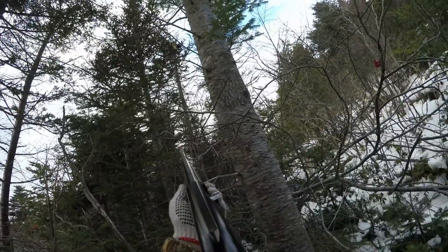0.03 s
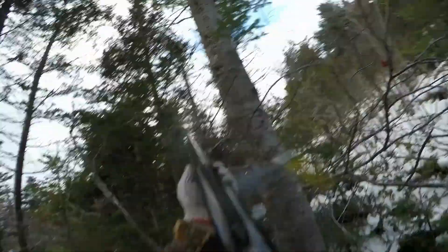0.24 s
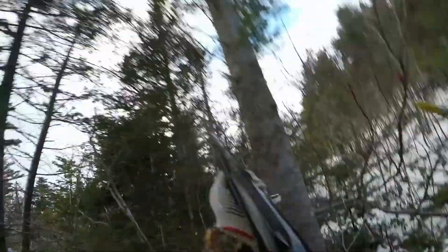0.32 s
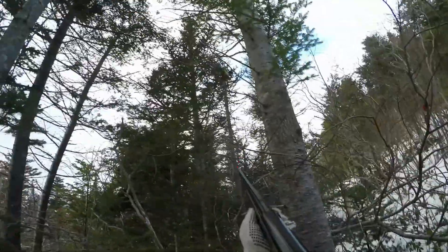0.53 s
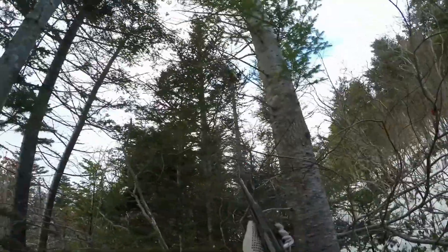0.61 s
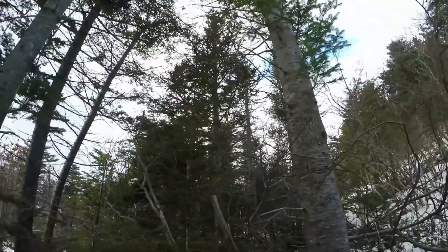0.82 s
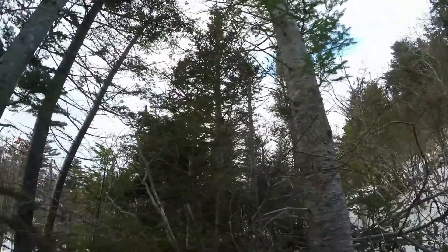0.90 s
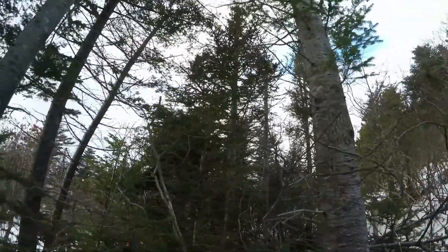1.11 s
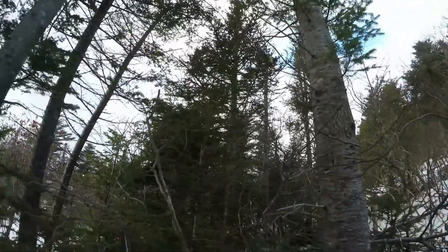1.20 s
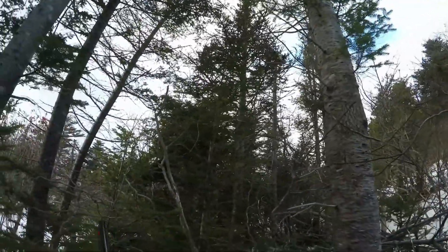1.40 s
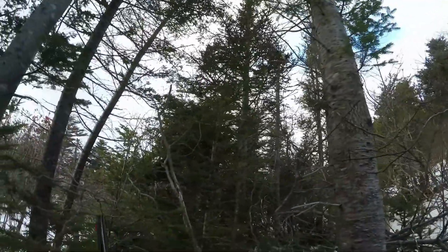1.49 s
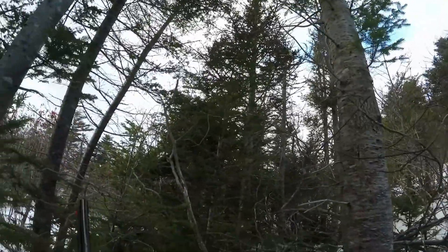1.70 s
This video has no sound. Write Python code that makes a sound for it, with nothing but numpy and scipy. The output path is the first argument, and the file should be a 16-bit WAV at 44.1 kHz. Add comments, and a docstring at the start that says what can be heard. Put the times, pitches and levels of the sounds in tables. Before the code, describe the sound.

One sharp gunshot goes off right beside the microphone in a snowy wood and distorts briefly. A short tail, a metallic click and hollow echoes follow, then a few soft clicks and light wind as the gun is lowered.

```python
"""In a snowy wood, a long gun fires once, close by. The action snaps, then the muzzle blast, a sudden release
of gas, overloads the microphone. Trunks reflect and scatter the crack into a short tail; echoes and a low roll
return from the slopes, and each echo is heard as a short low ringing. The gun clicks as it recoils and is
lowered, over faint hiss and wind on the microphone."""
import sys
import numpy as np
from scipy import signal
from scipy.fft import rfft, irfft
from scipy.io import wavfile

SR = 44100
rng = np.random.default_rng(int(sys.argv[2]) if len(sys.argv) > 2 else 0)


def waveform_to_disk(signal):
    """Save audio, clipped to [-1, 1], as 16-bit WAV at the path in sys.argv[1]."""
    frames = np.transpose(np.atleast_2d(signal))
    scaled = np.clip(frames, -1, 1) * 32767
    samples = np.round(scaled).astype(np.int16)
    wavfile.write(sys.argv[1], SR, samples)


N = 77175
TIME = np.arange(N) / SR
FREQS = np.maximum(np.fft.rfftfreq(N, 1 / SR), 1)
BLAST_S = .2352

# spectrum of the crack, direct and reflected: frequency_hz, level_db
CRACK_SPECTRUM = [(150, -12), (520, 2.5), (700, -3), (850, -2), (1050, -8), (1450, 5.5), (1950, -9),
                  (2300, -2), (2700, 2), (3800, -7), (4500, -4.5), (5700, -2), (8200, -15), (11000, -13),
                  (15000, -21)]


def from_db(db):
    """Amplitude grows tenfold every 20 dB."""
    return 10 ** (np.asarray(db) / 20)


def level(curve):
    """Gain over time, interpolated in decibels between (time_s, level_db) points."""
    return from_db(np.interp(TIME, *np.transpose(curve)))


def noise(spectrum, tilt_db=0):
    """Spectral shaping of white noise, tilted by tilt_db per octave above 900 Hz; rms 1."""
    hz, db = np.transpose(spectrum)
    shape_db = np.interp(np.log(FREQS), np.log(np.sort(hz)), db)
    gain = from_db(shape_db + tilt_db * np.log2(np.maximum(FREQS, 900)))
    x = irfft(rfft(rng.standard_normal(N)) * gain, N)
    return x / x.std()


def since(start):
    """Seconds since a moment, zero before it."""
    return np.maximum(TIME - start, 0)


def burst(start, rise_s, t60_s):
    """Envelope of an impulse: a quick rise, then exponential decay."""
    t = since(start)
    return (1 - np.exp(-t / rise_s)) * np.exp(-np.log(1000) * t / t60_s)


def swell(centre_s, half_s):
    """Gaussian envelope, down to 1/e at half_s from its centre."""
    return np.exp(-((TIME - centre_s) / half_s) ** 2)


def thud(start, hz, swell_s):
    """A damped oscillation whose envelope peaks at 1 after swell_s."""
    u = since(start) / swell_s
    return u ** 2 * np.exp(2 * (1 - u)) * np.sin(2 * np.pi * hz * since(start))


def flutter(rate_hz, depth_db):
    """Random amplitude modulation, as of many separate returns; rms 1."""
    slow = signal.sosfilt(signal.butter(2, rate_hz, fs=SR, output="sos"), rng.standard_normal(N))
    gain = from_db(depth_db * np.clip(slow / slow.std(), -2, 2))
    return gain / np.sqrt(np.mean(gain ** 2))


def fade_by_band(x, start, t60_s, exponent):
    """Frequency-dependent decay from start: t60_s holds at 2 kHz and goes as a power of frequency."""
    octave = np.clip(np.log2(FREQS / 2000), -5, 3)
    spectrum, out = rfft(x), 0
    for k in range(-5, 4):
        band = irfft(spectrum * np.maximum(1 - abs(octave - k), 0), N)
        out = out + band * np.exp(-np.log(1000) * since(start) / (t60_s * 2 ** (exponent * k)))
    return out


def air():
    """Turbulence rumbles on the microphone; broadband hiss dips after the shot and slowly returns."""
    # spectra: frequency_hz, level_db
    hiss_spectrum = [(60, 2.5), (130, 5), (230, 13.5), (450, 17), (700, 2), (1100, -2), (1500, 2.5),
                     (2000, -3), (2850, 0.5), (3500, -12.5), (5000, -17.5), (8000, -32), (15000, -40)]
    wind_spectrum = [(15, 2.5), (40, 5), (70, -3.5), (110, -14), (200, -26), (500, -55)]
    treble_spectrum = [(1500, -20), (3200, -5.5), (5000, 0.5), (6500, -1.5), (8000, -7), (12000, -6.5),
                       (15000, -9)]
    # envelopes: time_s, level_db
    hiss_curve = [(0, -53), (.22, -53), (.3, -68.5), (.65, -61.5), (.8, -63.5), (1.1, -68), (1.3, -65),
                  (1.44, -62), (1.54, -62.5), (1.63, -57.5), (1.75, -56.5)]
    wind_curve = [(0, -51.5), (.08, -40), (.2, -50), (.35, -58), (.55, -63.5), (.8, -57), (1.05, -67),
                  (1.2, -58), (1.32, -59.5), (1.42, -45.5), (1.49, -48.5), (1.54, -52.5), (1.75, -54)]
    treble_curve = [(0, -70.5), (.22, -69), (.35, -80), (.65, -86), (.85, -78.5), (1.08, -84.5),
                    (1.25, -76), (1.45, -76.5), (1.53, -74), (1.62, -71), (1.75, -69)]
    hiss = level(hiss_curve) * noise(hiss_spectrum)
    wind = level(wind_curve) * noise(wind_spectrum)
    treble_hiss = level(treble_curve) * noise(treble_spectrum)
    return hiss + wind + treble_hiss


def handling():
    """Impact and friction: steel clicks, sleeves rub, the trigger squeaks, the lowered gun knocks."""
    # spectra: frequency_hz, level_db
    steel_spectrum = [(100, -34), (500, -14.5), (800, -19.5), (1200, -10), (1400, -12.5), (1700, -3),
                      (2050, -8), (2400, 0.5), (3000, 1.5), (3400, -11.5), (3750, -3.5), (4250, -7.5),
                      (4950, 0.5), (6200, -8), (8500, -17.5), (10200, -13), (13000, -14), (15500, -23.5)]
    cloth_spectrum = [(300, -20), (1500, -12), (2800, 4), (3800, -8), (8000, -19), (15000, -30)]
    # steel parts meeting: start_s, level_db, tilt_db_per_octave, t60_s
    impacts = [(0.2294, -34, 7, 0.024), (.3765, -59, 7.5, .025), (0.3943, -42, 1, 0.035),
               (0.4031, -24.5, -4, 0.022), (.5084, -55, -1, 0.013), (.8111, -51.5, 4.5, 0.024),
               (0.8185, -54.5, 5, .018), (1.234, -58, 1, 0.02), (1.3335, -50.5, -11, .018),
               (1.3594, -58.5, 5.5, .02), (1.576, -43.5, -6, 0.019), (1.6114, -54, -8, 0.031),
               (1.7454, -45, -5, .03)]
    # sleeves sliding: centre_s, level_db, half_length_s, tilt_db_per_octave
    strokes = [(.79, -73, .028, 7), (1.33, -66, 0.0096, -2), (1.437, -65, 0.0098, -1)]
    # soft knocks on the gun: start_s, peak_db, pitch_hz
    bumps = [(.717, -44.5, 170)]
    clicks = sum(from_db(db) * noise(steel_spectrum, tilt) * burst(start, rise_s=.00058, t60_s=t60)
                 for start, db, tilt, t60 in impacts)
    rubs = sum(from_db(db) * noise(cloth_spectrum, tilt) * swell(centre, half)
               for centre, db, half, tilt in strokes)
    squeak = from_db(-61.5) * swell(.205, half_s=.004) * np.sin(2 * np.pi * 6900 * TIME)
    knocks = sum(from_db(db) * thud(start, hz, swell_s=.0015) for start, db, hz in bumps)
    return clicks + rubs + squeak + knocks


def slope_echoes():
    """Reflection from the slopes: strong returns stand out as echoes, the rest merge into a low roll."""
    # echoes, each ringing at a low pitch: start_s, peak_db, pitch_hz
    returns = [(.2545, -11, 385), (0.2626, -11.5, 348), (0.299, -26.5, 423), (.3205, -22.5, 470),
               (.3655, -25, 334), (0.4328, -33, 370), (0.465, -28, 420), (0.9743, -35.5, 410),
               (1.007, -42.5, 430), (1.055, -42, 400), (1.2396, -41.5, 374), (1.3085, -42, 470)]
    # envelope of the roll: time_s, level_db
    roll_curve = [(.3, -64.5), (.41, -47), (.53, -46), (.6, -56), (.7, -58.5), (.86, -52), (1.05, -55),
                  (1.15, -55.5), (1.3, -55), (1.5, -56), (1.75, -67.5)]
    # its spectrum: frequency_hz, level_db
    roll_spectrum = [(60, -27), (160, -25.5), (260, -6.5), (350, -2.5), (450, 3), (560, -3.5), (700, -14.5),
                     (1000, -18.5), (1800, -29.5), (2800, -32.5), (3600, -41.5), (8000, -61)]
    echoes = sum(from_db(db) * thud(start, hz, swell_s=.0035) for start, db, hz in returns)
    roll = level(roll_curve) * noise(roll_spectrum) * flutter(rate_hz=70, depth_db=3)
    return echoes + roll


def trunk_reflections():
    """Early reflections: single close trunks each return a delayed, weaker crack."""
    # arrivals: start_s, level_db, tilt_db_per_octave
    slaps = [(0.2396, -7.5, 0), (0.2576, -15.5, -2.5), (0.2624, -14, 1.5), (0.2664, -13, -3),
             (.279, -19, -5.5), (.2838, -27.5, -0.5)]
    return sum(from_db(db) * noise(CRACK_SPECTRUM, tilt) * burst(start, rise_s=.00016, t60_s=.02)
               for start, db, tilt in slaps)


def wood_reverberation():
    """Multiple scattering: a dense tail from near trunks and branches, a duller one from deeper in."""
    # spectra of the scattered sound: frequency_hz, level_db
    near_spectrum = [(60, -12), (150, -7.5), (240, 5), (350, 7), (520, 11), (720, -6), (1050, -9.5),
                     (1500, -2.5), (2000, -7.5), (2700, 0.5), (3500, -9), (5500, -11), (8500, -22),
                     (11000, -23), (15000, -31)]
    far_spectrum = [(60, -28), (140, -22.5), (240, -1.5), (420, 5), (600, -8), (800, -15), (1200, -13),
                    (1600, -11.5), (2100, -14), (2900, -9.5), (3500, -24), (4800, -23), (8000, -40.5),
                    (15000, -49)]
    near_rise_s, far_hold_s = .0047, .16
    near = fade_by_band(noise(near_spectrum), BLAST_S, t60_s=.19, exponent=.02)
    far = fade_by_band(noise(far_spectrum), BLAST_S + far_hold_s, t60_s=.41, exponent=-.12)
    near *= 1 - np.exp(-since(BLAST_S) / near_rise_s)
    near *= flutter(rate_hz=510, depth_db=3)
    far *= TIME > BLAST_S
    return from_db(-7.5) * near + from_db(-38.5) * far


def ground_thump():
    """Ground reflection: the blast comes back as a low damped oscillation."""
    start_s, pitch_hz = .2438, 156
    envelope = from_db(-6) * burst(start_s, rise_s=.0003, t60_s=.05)
    return envelope * np.sin(2 * np.pi * pitch_hz * since(start_s))


def action_snap():
    """An impact in the action excites bright, fast-dying resonances just ahead of the blast."""
    # spectrum of the action: frequency_hz, level_db
    snap_spectrum = [(300, -21.5), (1500, -15), (2950, -1), (3800, -8), (5300, 2.5), (7000, -9.5),
                     (9000, -16.5), (13000, -13), (15500, -19)]
    return from_db(-10) * noise(snap_spectrum) * burst(.2313, rise_s=.0002, t60_s=.018)


def muzzle_blast():
    """Expanding gas makes a crack and a blast wave: pressure swings sharply one way and slowly back."""
    crack = from_db(5.5) * noise(CRACK_SPECTRUM) * burst(BLAST_S, rise_s=.0001, t60_s=.026)
    wave_start_s, first_swing_s, band_hz = .2368, .0062, [10, 383]
    u = since(wave_start_s) / first_swing_s
    wave = (u > 0) * (u - 1) * np.exp(-u)
    wave = signal.sosfilt(signal.butter(2, band_hz, "band", fs=SR, output="sos"), wave + 1e-18)
    wave *= from_db(11.5) * swell(wave_start_s, half_s=.025)
    rebound = -from_db(-22) * swell(.279, half_s=.014)   # the air's last slow swing
    return crack + wave + rebound


def scene():
    """Superposition: direct sound, reflections and background add at one microphone."""
    shot = action_snap() + muzzle_blast()
    reflections = ground_thump() + trunk_reflections() + wood_reverberation() + slope_echoes()
    return (shot + reflections + handling() + air())[None]


def record(dry):
    """Saturation flattens the blast at full scale; a steep low-pass filter cuts the highest treble."""
    knee, cutoff_hz = 6, 15400
    clipped = dry / (1 + abs(dry) ** knee) ** (1 / knee)
    return signal.sosfilt(signal.ellip(12, .1, 90, cutoff_hz, fs=SR, output="sos"), clipped)


dry = scene()
out = record(dry)
waveform_to_disk(out)
```